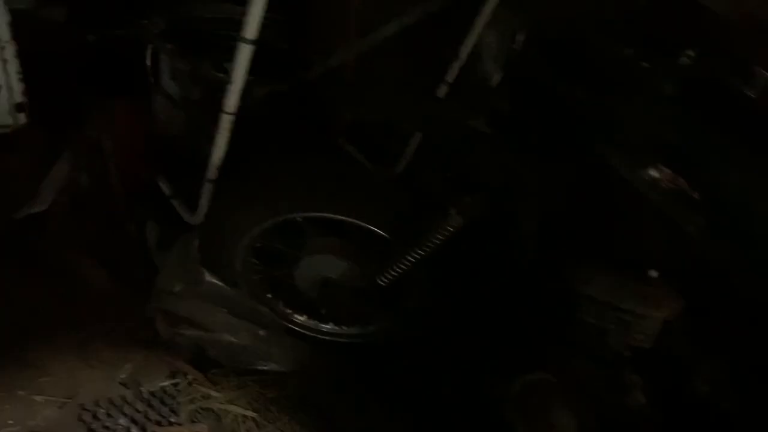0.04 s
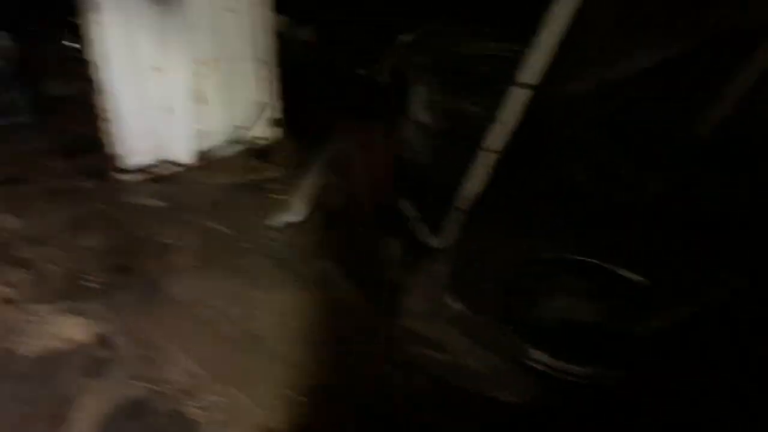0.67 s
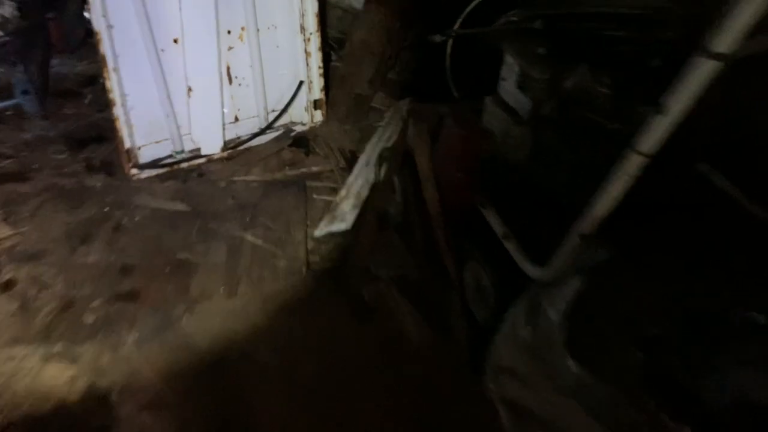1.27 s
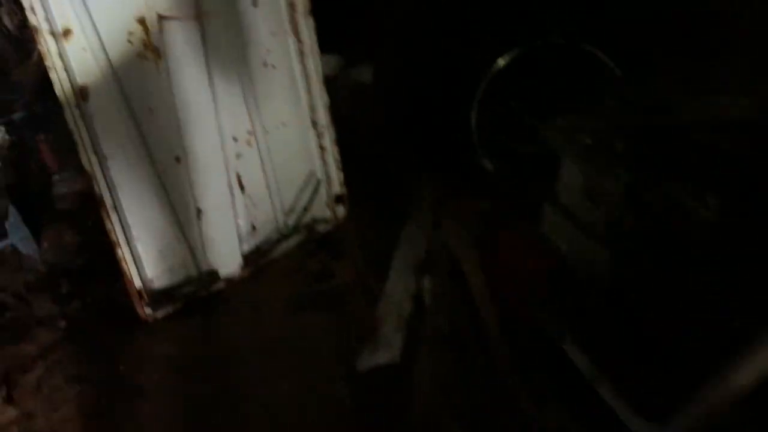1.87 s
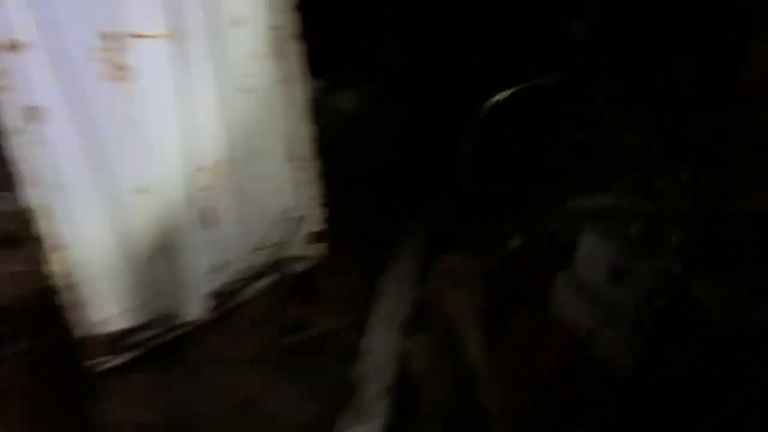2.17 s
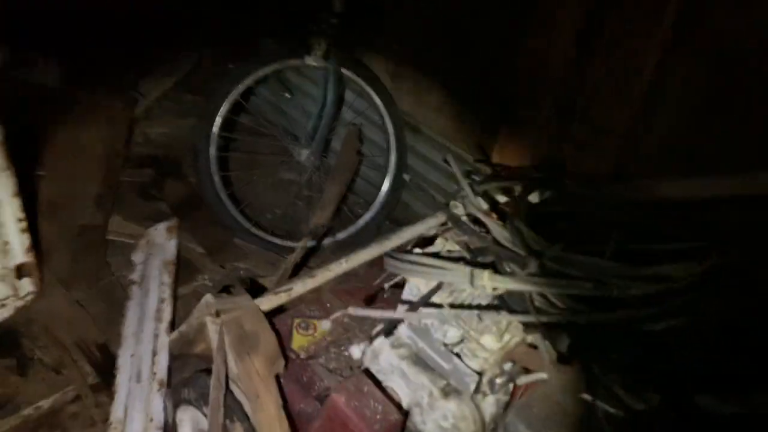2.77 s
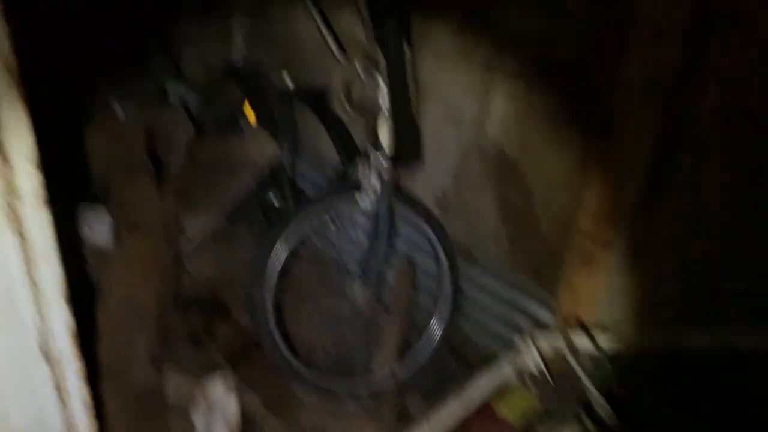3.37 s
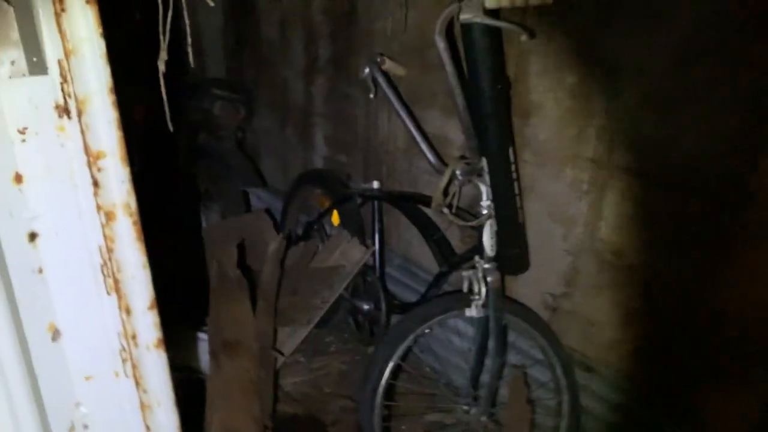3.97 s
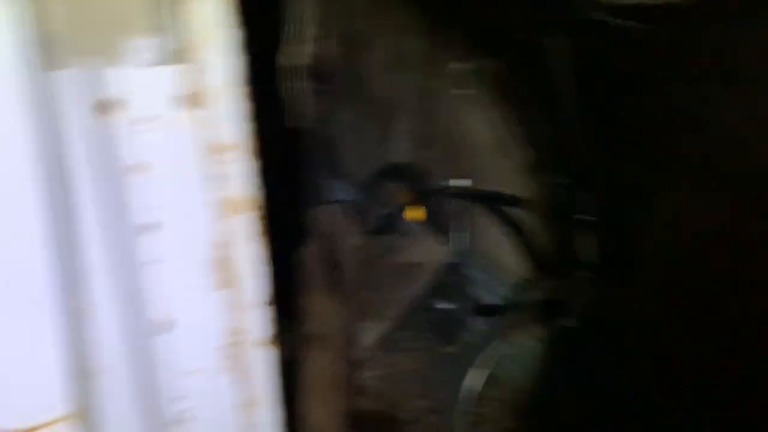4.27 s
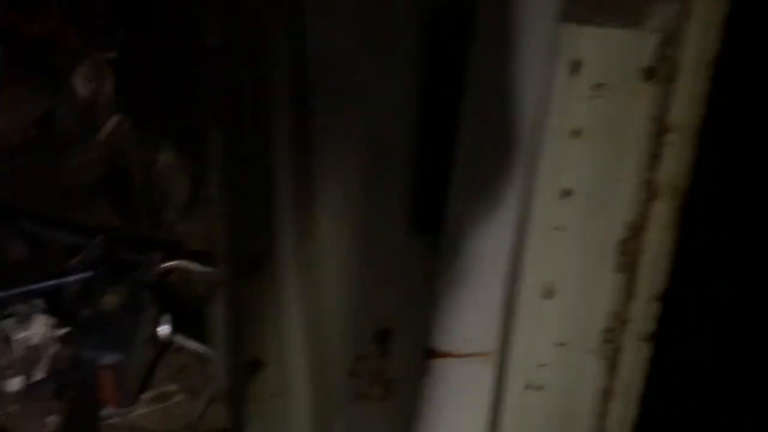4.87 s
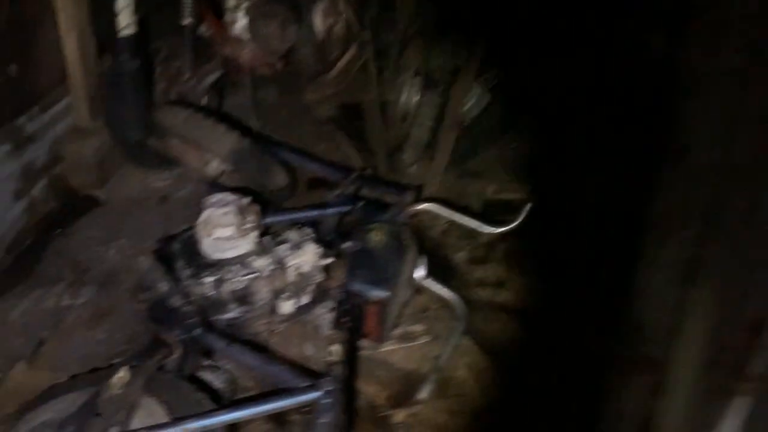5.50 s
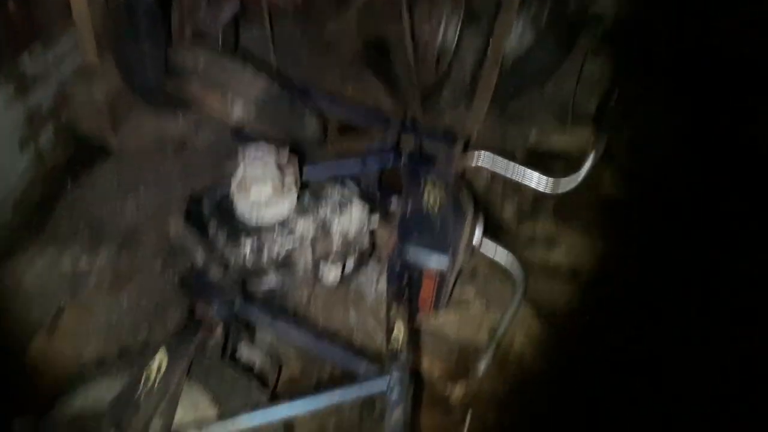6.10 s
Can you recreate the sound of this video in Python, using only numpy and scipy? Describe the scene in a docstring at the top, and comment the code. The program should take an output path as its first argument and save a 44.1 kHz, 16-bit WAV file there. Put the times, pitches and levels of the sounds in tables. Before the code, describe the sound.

Close, uneven footsteps crunch over grit and scrap inside a cramped storage container. Two loud clusters of cracks come first, one with a short groan of a flexing panel, the other with knocking wood. A pause leaves only a faint rumble. Then quieter steps thud and scrape among clicking, rattling junk until a hard slat clacks down. Each impact has a short, dense echo.

```python
"""Grit scrapes underfoot over a low rumble: someone picks a way through junk in a steel storage container.
Stick-slip friction makes the scrapes; steps thud by exciting damped modes of the floor. Scrap cracks
and loose boards knock, each impact followed by free vibration. A flexing panel groans, and near the end
a hard slat drops with a clack. Reflections in the cluttered box add a short, dense echo."""
import sys
import numpy as np
from scipy import signal
from scipy.fft import rfft, irfft, next_fast_len
from scipy.io import wavfile
from scipy.ndimage import uniform_filter1d

SR = 44100
rng = np.random.default_rng(int(sys.argv[2]) if len(sys.argv) > 2 else 0)


def digitize_waveform(pressure):
    """Quantize a signal to 16-bit integers and store it at the path in sys.argv[1].

    Rows of a 2-D input are taken as channels; values are limited to [-1, 1].
    """
    field = np.atleast_2d(pressure).T
    bounded = np.clip(field, -1, 1)
    quanta = np.round(bounded * 32767).astype(np.int16)
    wavfile.write(sys.argv[1], SR, quanta)


N = 275444
TIME = np.arange(N) / SR
PADDED = next_fast_len(N, True)
BINS_HZ = np.fft.rfftfreq(PADDED, 1 / SR)


def amp(db):
    return 10 ** (np.asarray(db) / 20)


def unit_rms(x):
    return x / np.sqrt(np.mean(x ** 2) + 1e-20)


def burst(x, span_s):
    """Energy normalisation: x gets the energy of rms 1 held for span_s."""
    return x * np.sqrt(span_s * SR / (np.sum(x ** 2) + 1e-20))


def at_hz(points, hz):
    """Interpolation on a logarithmic frequency axis."""
    f, value = np.transpose(points)
    return np.interp(np.log(hz + 1), np.log(f + 1), value)


def follow(rows):
    """Linear interpolation of a time table's columns at every sample."""
    s, *columns = np.transpose(rows)
    return [np.interp(TIME, s, c) for c in columns]


def add(mix, s, sound):
    """Superposition of a sound starting at s seconds, possibly before zero."""
    at = round(s * SR)
    sound = sound[max(-at, 0):]
    part = mix[max(at, 0):][:len(sound)]
    part += sound[:len(part)]


def colour(x, points, size=2048):
    """Minimum-phase filtering by a curve of (f/Hz, gain/dB)."""
    log_gain = np.log(amp(at_hz(points, abs(np.fft.fftfreq(size, 1 / SR)))))
    taps = np.fft.ifft(np.exp(np.conj(signal.hilbert(log_gain)))).real[:size // 2]
    return signal.oaconvolve(x, taps)[:len(x)]


def ring(hz, db, t60, t):
    """Free vibration: a sum of exponentially damped modes."""
    hz, db, t60 = (np.reshape(v, (-1, 1)) for v in (hz, db, t60))
    return (amp(db - 60 * t / t60) * np.sin(2 * np.pi * hz * t)).sum(0)


# Rushes of noise: t/s, duration/s, level/dB, relative level of the boards layer/dB
# Most are scuffs on grit; those at 2.027 and 4.376 s are a brief, soft rush just before a crack.
RUSHES = [(-.012, 0.019, -40, -0.5), (0.267, 0.15, -61, 1.5), (0.548, 0.17, -66, 1.5),
          (0.955, 0.047, -31.5, -12), (0.99, 0.067, -41.5, -7.5), (1.064, 0.043, -39, -15),
          (1.382, 0.058, -40, -29), (1.54, 0.064, -43.5, -16), (1.985, 0.023, -49.5, -6),
          (2.027, 0.013, -41, -21), (2.085, 0.032, -49, 13), (2.109, 0.021, -36, 3),
          (2.134, 0.062, -37, -9), (2.577, 0.05, -63.5, 12.5), (3.533, 0.053, -68, -4),
          (3.886, 0.12, -48.5, 4.5), (4.024, 0.064, -47, 1.5), (4.136, 0.12, -48.5, 0.5),
          (4.376, 0.04, -55.5, 5.5), (4.645, 0.061, -67.5, 10.5), (4.764, 0.14, -46.5, -5.5),
          (5.116, 0.29, -55, -4.5), (5.328, 0.038, -46, 4.5), (5.377, 0.11, -37.5, -1.5),
          (5.495, 0.45, -46, 1), (5.851, 0.11, -41, -14)]


def rush_envelopes(rise_s=0.01, sag_db_per_s=42.5, stop_db_per_s=301, tail_db_per_s=58):
    """Incoherent sources add in power: each rush rises, sags, stops and leaves a faint tail."""
    grit, boards, t = np.zeros(N), np.zeros(N), np.arange(SR) / SR
    for s, length, db, boards_db in RUSHES:
        after = np.maximum(t - length, 0)
        held = np.minimum(t / rise_s, 1) * amp(db - sag_db_per_s * (t - after))
        rush = held * amp(-stop_db_per_s * after)
        tail = held * amp(-16.5 - tail_db_per_s * after)
        add(grit, s, rush ** 2 + tail ** 2)
        add(boards, s, (amp(boards_db) * rush) ** 2 + (amp(1) * tail) ** 2)
    return np.sqrt(grit), np.sqrt(boards)


def grains(per_s, spread_db):
    """A Poisson process of clicks, uneven in size."""
    out, at = np.zeros(N), np.flatnonzero(rng.random(N) < per_s / SR)
    sign, size = rng.random((2, N))[:, at]
    out[at] = np.sign(sign - .5) * amp(spread_db * np.minimum(-np.log(1 - size), 4))
    return unit_rms(out)


def rattle(low_hz=129.5, high_hz=1888, t60_cycles=16, count=20):
    """Impulse excitation: loose pieces, struck at random, each ring at their natural frequency."""
    out, t = np.zeros(N), np.arange(SR // 10) / SR
    for hz in low_hz * (high_hz / low_hz) ** ((np.arange(count) + rng.random(count)) / count):
        piece = ring(hz, 0, t60_cycles / hz, t)
        hits = grains(per_s=18, spread_db=3)
        out += np.sqrt(hz) * signal.oaconvolve(hits, piece / np.linalg.norm(piece))[:N]
    return unit_rms(out)


def scrapes_and_rushes(break_db=-53):
    """Stick-slip friction: in a scrape, grit catches and lets go, chips break and boards rattle."""
    on_grit, on_boards = rush_envelopes()
    friction = unit_rms(grains(per_s=480, spread_db=2) + amp(-9) * rng.standard_normal(N))
    grit = colour(friction, [(300, -26), (1000, -1.5), (1600, 6), (2200, 1), (3400, 4.5), (5300, .5),
                             (7800, -5), (11000, -13), (15500, -17.5)])
    chips = colour(grains(per_s=27, spread_db=4.5),
                   [(300, -21), (2100, -6.5), (3400, -6), (8500, -1), (15500, -12)])
    boards = colour(rattle() + amp(-10) * friction,
                    [(40, -27), (150, -8.5), (260, -1.5), (420, -2.5), (560, -6.5), (880, -6.5),
                     (1150, 1), (1500, -1), (2400, -11.5), (6000, -42)])
    breaking = on_grit / (on_grit + amp(break_db))  # chips break only under load
    surface = amp(-2) * unit_rms(grit) + amp(-7) * breaking * unit_rms(chips)
    return on_grit * surface + amp(-5) * on_boards * unit_rms(boards)


# Background noise spectrum: f/Hz, relative level/dB
AIR_SPECTRUM = [(20, -24), (42, -13), (72, -2), (115, -9.5), (170, -25.5), (450, -26), (900, -23.5),
                (1400, -20.5), (2500, -34.5), (5000, -41), (10000, -44), (15500, -48.5)]
# Swell of the container's rumble: t/s, gain/dB
RUMBLE = [(0, -6), (1.8, -1), (2.25, 9.5), (2.5, 5.5), (2.75, 7), (3.1, 0), (3.7, 4.5), (4.3, 8), (4.6, 5),
          (5.1, 12.5), (5.7, 14), (6.24, 10.5)]


def background(level_db=-62, split_hz=150, apart_db=-11):
    """Filtered noise: a swelling rumble under faint air that is partly coherent between channels."""
    shape = amp(at_hz(AIR_SPECTRUM, BINS_HZ))
    air = rfft(rng.standard_normal((3, PADDED))) * shape / np.sqrt(np.mean(shape ** 2))
    bass = 1 / (1 + (BINS_HZ / split_hz) ** 6)
    rumble = amp(follow(RUMBLE)[0]) * irfft(air[0] * bass, PADDED)[:N]
    hiss = irfft(air * (1 - bass), PADDED)[:, :N]
    return amp(level_db) * (rumble + ports(hiss[0]) + amp(apart_db) * hiss[1:])


# Weight landing on the floor: t/s, level/dB, strongest mode f/Hz
THUDS = [(.267, -57, 410), (1, -35, 194.7), (1.57, -56.5, 172.7), (2.143, -45, 152.2), (2.599, -54, 177.3),
         (3.888, -37.5, 106.3), (4.047, -45, 106.6), (4.236, -49, 116.5), (4.406, -56, 112),
         (4.89, -54, 404), (5.406, -46.5, 114), (5.598, -50.5, 89)]


def thuds(rise_cycles=0.31, decay_s=0.016):
    """A soft push excites damped floor modes; the deeper the thud, the slower the weight comes on."""
    out, t = np.zeros(N), np.arange(SR // 4) / SR
    for s, db, hz in THUDS:
        modes = ring(hz * np.array([.63, 1, 1.28, 1.95]), [-9, 1.5, -4.5, -14], decay_s * np.log(1000), t)
        loading = 1 - np.exp(-t * hz / rise_cycles)
        add(out, s, amp(db) * burst(modes * loading, 0.029))
    return out


# Impacts on scrap: t/s, level/dB, body gain (400-1400 Hz)/dB, top gain (above 8 kHz)/dB,
# contact time/s, ring f/Hz, relative ring level/dB
KNOCKS = [(0.6639, -61, 14, -8, 0.0041, 1000, -14), (0.773, -59.5, -1, -6, .0006, 6530, -4),
          (0.9922, -17, -27, -7, .0022, 4280, -10.5), (0.9964, -19, 5, 1.5, 0.0026, 2500, -8),
          (1.057, -27.5, -11, 1, 0.00028, 2770, 1.5), (1.0623, -19.5, -23.5, 4.5, 0.0018, 5600, -9),
          (1.0697, -22, -6.5, -6.5, 0.00069, 4240, -16), (1.1022, -30.5, -7, 8, 0.00096, 8200, -14),
          (1.108, -31.5, -5, 0, 0.0013, 3457, 1), (1.2473, -30, -2, -1, 0.0014, 3200, -7.5),
          (1.301, -43.5, -3, 0, 0.00082, 3160, -21), (1.3998, -30.5, -5, 2, 0.00076, 2700, -16),
          (1.4358, -26, -4.5, 1, 0.0018, 2480, -13), (1.5477, -38.5, -1.5, 1, .0008, 3720, -10),
          (1.5701, -32, -5.5, -5, 0.0017, 4000, -11), (1.702, -52.5, 6, -7.5, 0.005, 1270, -14),
          (1.794, -51, 9, -14, 0.0014, 3770, -1.5), (1.981, -49, -5, -1.5, 0.0034, 4110, -14.5),
          (2.045, -30.5, -17.5, -8.5, 0.0016, 4220, -7), (2.051, -37.5, -7.5, -9.5, 0.0011, 4560, -8),
          (2.1229, -29.5, 5.5, 1, .005, 2100, -14), (2.1403, -18.5, 4, 0, 0.0038, 5600, -22.5),
          (2.149, -23, 7, 2.5, .007, 4400, -6), (3.874, -49, 22, -18, 0.004, 830, -10),
          (3.9365, -44, -3, 2, 0.0045, 8000, -17), (4.0373, -36.5, 7.5, 1.5, 0.0027, 8200, -22),
          (4.1454, -41, -7, 6, .005, 6320, -7), (4.186, -35.5, -5.5, 3.5, 0.00089, 4880, -8.5),
          (4.2293, -28.5, -2.5, 1.5, 0.0015, 5750, -12), (4.401, -32.5, -9, 1, 0.0024, 5370, -11),
          (4.7792, -41, -2.5, -1.5, 0.0032, 2180, -10), (4.8558, -37.5, -7, 3, .002, 6500, -8),
          (4.8921, -34.5, -22, -1.5, 0.0015, 4900, -27), (5.068, -55, -4, 9, 0.001, 5360, -12),
          (5.1535, -51, -7, -2, 0.0037, 5260, -10), (5.2123, -43.5, -13, -9, 0.0046, 6550, -8),
          (5.286, -45.5, 2, 4, 0.0019, 6900, -8), (5.323, -36.5, -8, 10.5, 0.0009, 8900, -12),
          (5.3279, -42.5, -7, 4, 0.00091, 7800, -14), (5.3578, -42, -3, 2, .001, 4660, -16),
          (5.3765, -39.5, -9, 0, 0.0017, 6550, -17), (5.3881, -32, -23, 1, .0005, 3420, -17),
          (5.4075, -31.5, -11, 1, 0.0011, 3400, -15), (5.4508, -39.5, -8, 13, .0008, 4100, -12),
          (5.4669, -28, -15, -1, 0.0018, 3350, -7), (5.5185, -43, -2, 0, 0.00085, 4170, -12),
          (5.531, -42.5, -4, 4, 0.00076, 3500, -24), (5.5622, -43, 0.5, 6, 0.0071, 1250, -15),
          (5.703, -54, -8, -2, .002, 6400, 0), (5.727, -49, 0, -1, .004, 2260, -7),
          (5.8651, -37.5, -1, 0, 0.0028, 5930, -18), (5.869, -26, -11, 5.5, 0.0021, 4200, -22.5),
          (6.127, -47.5, -11, 2.5, .0007, 5270, -8.5)]


def knocks(seat_s=0.00051, soft_contact_s=.003, ring_t60=.02, chatter_t60=.03):
    """Impact excitation: a tick and a crunch, coloured by the resonance of the piece, which rings on."""
    hz = np.geomspace(40, 16000, 80)
    out, t = np.zeros(N), np.arange(3000) / SR
    for s, db, body_db, top_db, contact, ring_hz, ring_db in KNOCKS:
        slips = np.exp(0.74 * unit_rms(uniform_filter1d(rng.standard_normal(len(t)), size=20)))
        envelope = (1 - np.exp(-t / seat_s)) * np.exp(-t / (2 * max(contact, 1e-4)))
        crunch = burst(rng.standard_normal(len(t)) * slips * envelope, 0.039)
        # a slow contact gives less of a tick
        tick = burst(signal.unit_impulse(len(t)), 0.03) * np.exp(-contact / soft_contact_s)
        place, size, life = rng.random((3, 16))  # 16 small modes
        chatter = ring(700 + 12000 * place ** 1.3, -12 * size, chatter_t60 * (.5 + life), t)
        blow = crunch + splinters(t, contact) + amp(-10) * tick + amp(-6) * burst(chatter, 0.0056)
        shape = [(40, body_db - 23.5), (150, body_db - 17.5), (450, body_db - 7), (850, body_db + .5),
                 (1450, -4.5), (2150, -5.5), (3200, 3.5), (5200, 2), (7800, 1.5),
                 (10000, top_db - .5), (15500, top_db - 7)]
        resonance_db = 4.5 * np.exp(-(np.log2(hz / ring_hz) / .3) ** 2)
        response = np.column_stack([hz, at_hz(shape, hz) + resonance_db])
        crack = unit_rms(colour(blow, response))
        tone = unit_rms(ring([ring_hz, 1.7 * ring_hz], [0, -10], ring_t60, t))
        add(out, s, amp(db) * burst(crack + amp(ring_db) * tone, 0.013))
    return out


def splinters(t, contact, mean_contacts=2.6, count=8):
    """Brittle fracture: small cracks follow the first, the later ones weaker."""
    out, (chance, sign) = np.zeros(len(t)), rng.random((2, count))
    delay = -np.log(1 - chance)
    at = np.minimum((delay * mean_contacts * contact * SR).astype(int), len(t) - 1)
    out[at] = np.sign(sign - .5) * np.exp(-delay / 2)
    return amp(-2.5) * burst(out, 0.0097)


def struck_wood(modes, blows, t60, seat_s, spot_db=1):
    """Modal superposition: the spot that is hit shifts how the modes share the energy."""
    out, t = np.zeros(N), np.arange(SR // 4) / SR
    hz, mode_db = np.transpose(modes)
    for s, db, pitch in blows:
        sound = ring(hz * pitch, mode_db + spot_db * rng.standard_normal(len(hz)), t60, t)
        add(out, s, amp(db) * burst(sound * (1 - np.exp(-t / seat_s)), 0.021))
    return out


# Modes of a loose board: f/Hz at ratio 1, relative level/dB
BOARD_MODES = [(335, -10), (420, -3), (582, -1.5), (738, 1), (861, 3), (960, 6.5), (1230, -1), (1650, -5)]
# Blows on the boards: t/s, level/dB, frequency ratio
BOARD_BLOWS = [(.997, -34, 0.95), (2.049, -48.5, 0.86), (2.111, -44, 1.03), (2.1354, -26.5, 1.05),
               (2.1425, -31, .98), (2.152, -32.5, 1.08), (2.166, -37.5, 0.91), (3.942, -53, 0.477),
               (3.998, -55, 0.597), (4.037, -49.5, 0.96), (4.148, -61.5, 0.63), (4.891, -60.5, 0.67),
               (5.327, -50, 0.96), (5.3596, -52, 0.46), (5.406, -45, 0.97), (5.4915, -43, 0.848),
               (5.593, -52, 0.57), (5.649, -54, 0.43), (5.78, -63.5, 0.67)]


def loose_boards():
    """Natural frequencies fall with size: a bigger board knocks lower."""
    return struck_wood(BOARD_MODES, BOARD_BLOWS, t60=.034, seat_s=0.0011)


# A loaded panel flexing: t/s, f/Hz, level/dB, relative overtone level/dB
FLEX = [(1.145, 205, -73, -10), (1.165, 216, -41, -10), (1.18, 184, -67, 3), (1.198, 179.4, -52.5, 7.5),
        (1.217, 180, -42.5, -29), (1.226, 284, -52.5, -16), (1.28, 256, -53.5, -11.5),
        (1.315, 226, -53.5, -17), (1.35, 208, -82, -24)]


def panel_groan(roughness=0.21, overtone_ratio=2.04):
    """Flexural vibration: a bent panel groans, its pitch shifting as the load comes off."""
    hz, db, overtone_db = follow(FLEX)
    phase = 2 * np.pi * np.cumsum(hz) / SR
    tone = np.sin(phase) + amp(overtone_db) * np.sin(overtone_ratio * phase)
    waver = 1 + roughness * unit_rms(uniform_filter1d(rng.standard_normal(N), size=300))
    sounding = (TIME > FLEX[0][0]) & (TIME < FLEX[-1][0])
    return np.sqrt(2) * sounding * amp(db) * waver * tone


# Modes of a hard slat: f/Hz at ratio 1, relative level/dB
SLAT_MODES = [(410, -4.5), (610, -4.5), (770, -7), (910, 4.5), (1030, 2), (1190, 9), (1440, 8.5),
              (1870, -5)]
# Its landing and bounce: t/s, level/dB, frequency ratio
SLAT_BLOWS = [(5.8645, -31.5, 1.01), (5.8694, -31, 0.976)]


def dropped_slat():
    """Impact and rebound excite heavily damped modes, heard as one clack."""
    return struck_wood(SLAT_MODES, SLAT_BLOWS, t60=.028, seat_s=0.00146)


# Reverberation time of the container: f/Hz, T60/s
REVERB_TIMES = [(80, 0.77), (250, 0.43), (900, 0.34), (3000, 0.31), (8000, 0.3), (15000, 0.19)]


def echoes(early_db=-3, early_t60=0.2, build_s=0.0027, hand_db=-20, hand_s=.0015):
    """Impulse response: reflections off the hand at the microphone, nearby junk, then the steel walls."""
    hz, t, noise = signal.stft(rng.standard_normal(SR * 3 // 4), SR, nperseg=256)
    tail = signal.istft(noise * amp(-60 * t / at_hz(REVERB_TIMES, hz)[:, None]), SR, nperseg=256)[1]
    t = np.arange(len(tail)) / SR
    fade = amp(-60 * t / early_t60) + amp(hand_db) * np.exp(-t / hand_s)
    early = rng.choice([-1, 1], len(t)) * (rng.random(len(t)) < 2500 / SR) * fade
    echo = tail / np.linalg.norm(tail) + amp(early_db) * early / np.linalg.norm(early)
    echo *= 1 - np.exp(-t / build_s)
    return echo / np.linalg.norm(echo)


def container(x, shift_s=.07, count=5, **pattern):
    """Time-varying reverberation: one echo pattern fades into the next as the walker moves."""
    out = np.zeros(N)
    for k in range(count):
        away = abs((TIME / shift_s - k + count / 2) % count - count / 2)
        share = np.cos(np.pi / 2 * np.minimum(away, 1))
        out += signal.oaconvolve(x * share, echoes(**pattern))[:N]
    return out


# Nearby echoes that differ between left and right: f/Hz, gain/dB
NEAR_ECHO_GAIN = [(60, -45), (170, -24), (320, -12), (800, -5.5), (2200, -3.5), (3400, -5), (6000, -9),
                  (15000, -9)]


def near_echoes(x):
    """Decorrelation: each channel gets its own nearby reflections, weak in the bass."""
    reflected = colour(x, NEAR_ECHO_GAIN)
    return np.array([container(reflected, early_db=9, early_t60=0.085, build_s=0.0001, hand_db=6)
                     for channel in range(2)])


# Lead of the left microphone port over the right: f/Hz, phase/rad
PORT_PHASE = [(0, 0), (250, 0), (650, -.3), (850, .9), (1100, 2.8), (2000, 3), (3400, 2.5), (5300, 3.1),
              (8200, .4), (9600, -.3), (11700, -3.1), (13200, -3.3), (14500, -5.9), (15800, -6.3)]


def ports(x):
    """Phase difference: one sound reaches two ports with a lead that depends on frequency."""
    lead = np.interp(BINS_HZ, *np.transpose(PORT_PHASE))
    return irfft(rfft(x, PADDED) * np.exp(.5j * np.array([lead, -lead])), PADDED)[:, :N]


def scene(wet_db=-5, low_wet_db=-7):
    """Superposition of direct sound, reverberation and background, in stereo."""
    junk = knocks() + scrapes_and_rushes() + dropped_slat() + loose_boards()
    low = thuds() + panel_groan()
    shared = junk + amp(wet_db) * container(junk) + low + amp(low_wet_db) * container(low)
    return ports(shared) + near_echoes(junk) + background()


def record(dry):
    """Band limiting by a linear-phase low-pass filter."""
    lowpass = signal.firwin(255, cutoff=15900, window=("kaiser", 8), fs=SR)
    return signal.oaconvolve(dry, lowpass[None], "same", axes=1)


dry = scene()
out = record(dry)
digitize_waveform(out)
```